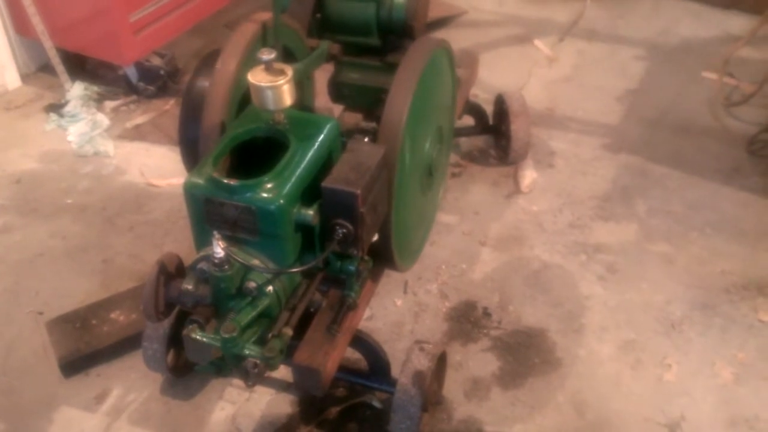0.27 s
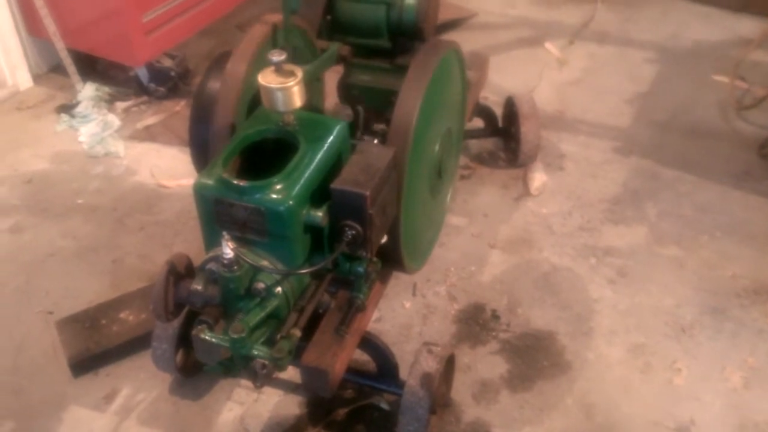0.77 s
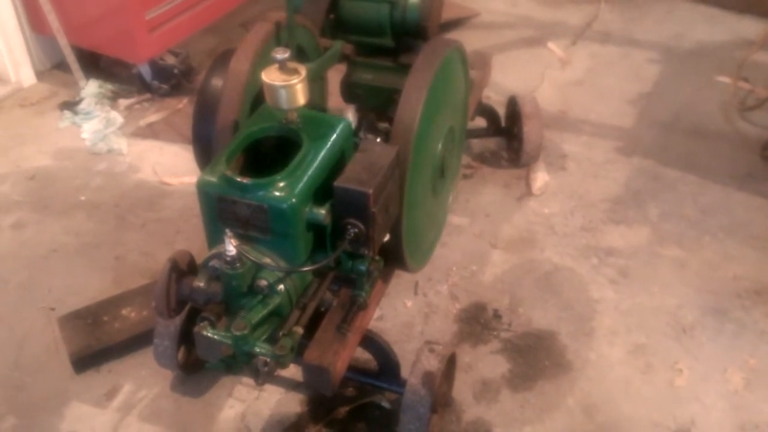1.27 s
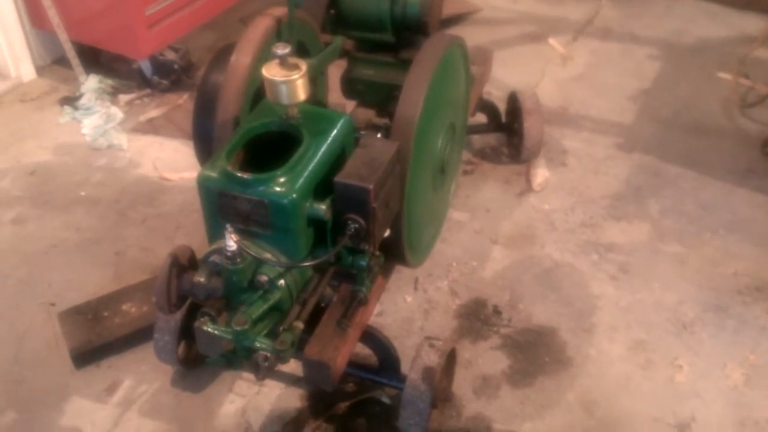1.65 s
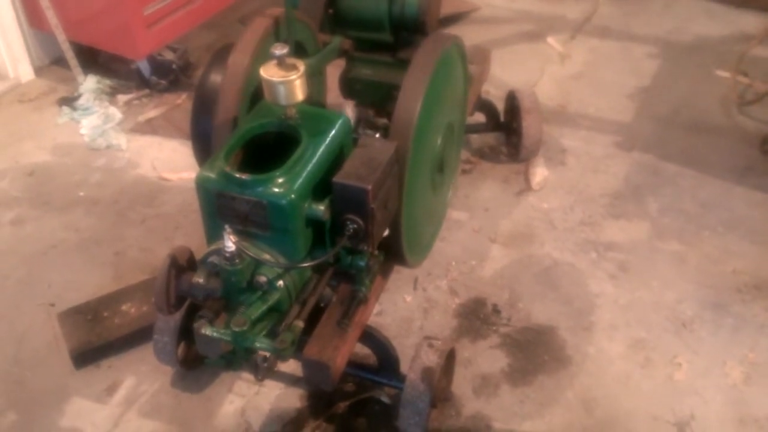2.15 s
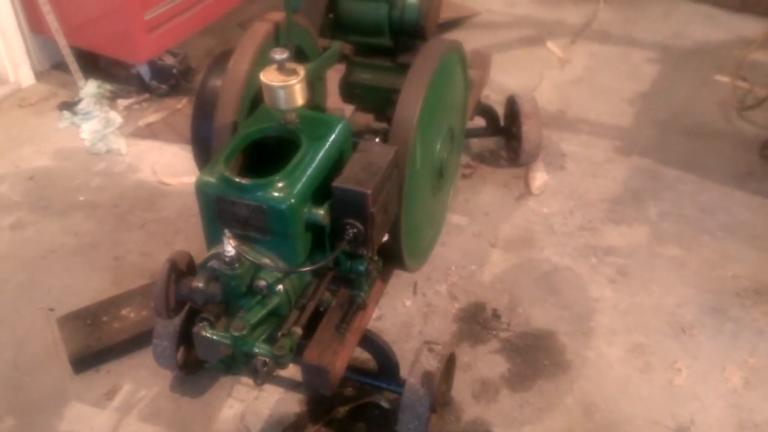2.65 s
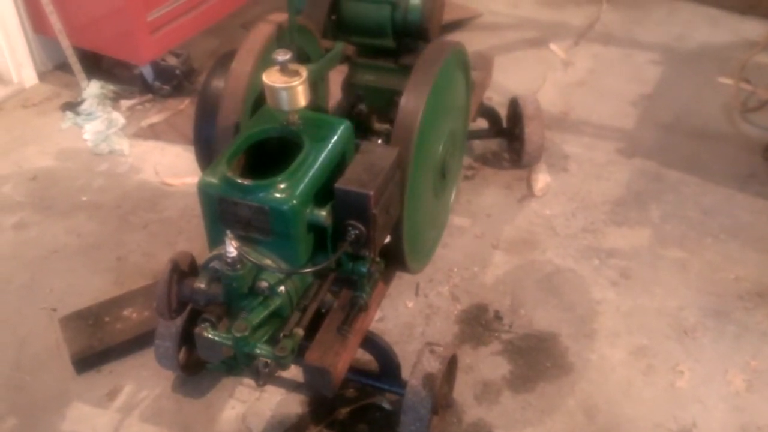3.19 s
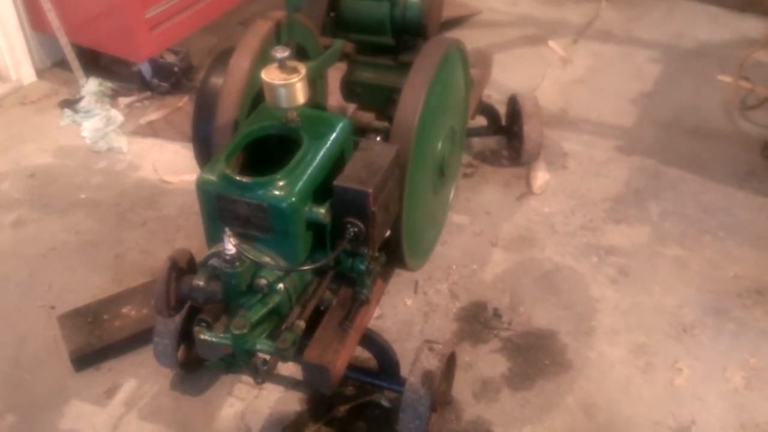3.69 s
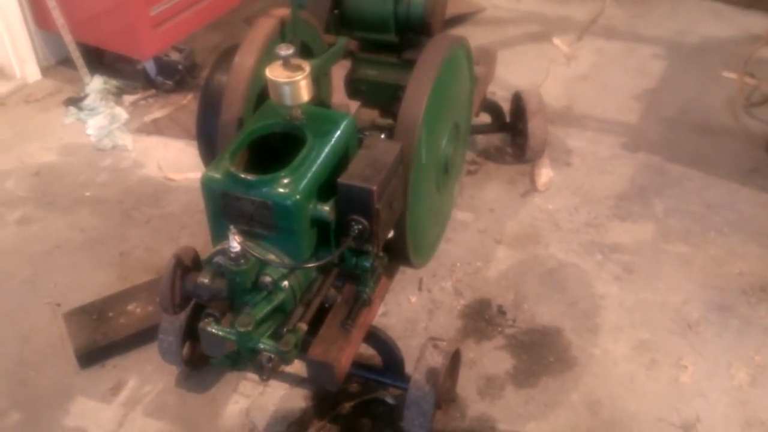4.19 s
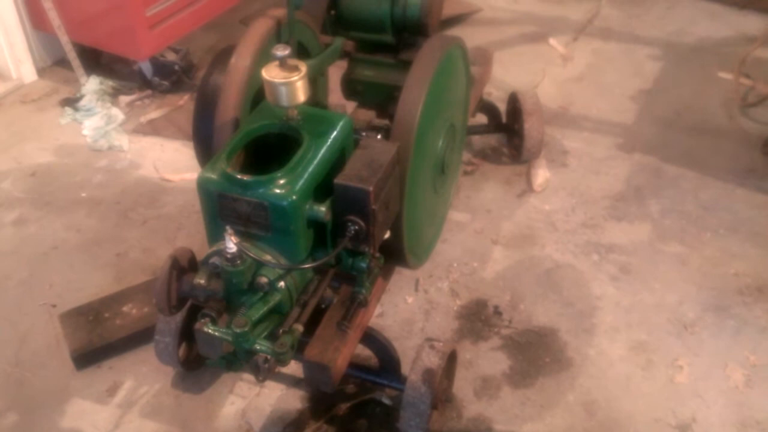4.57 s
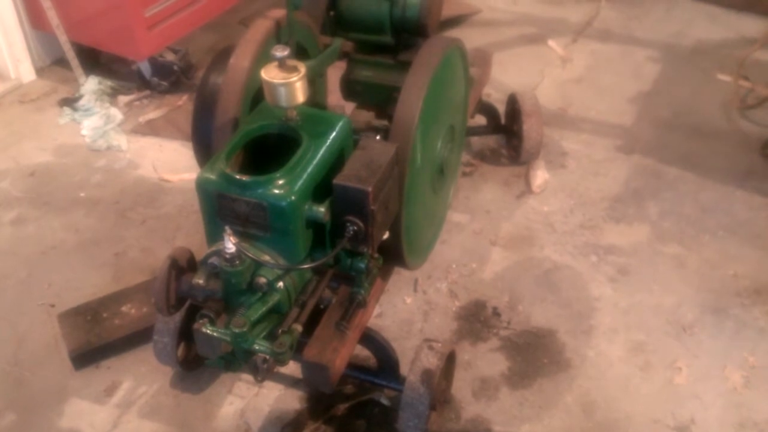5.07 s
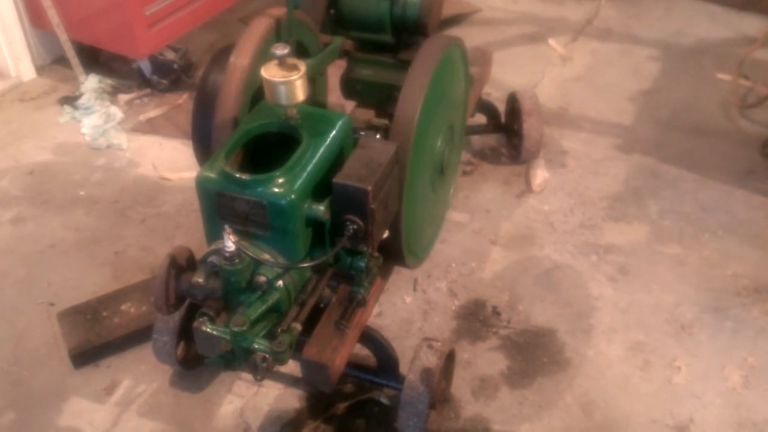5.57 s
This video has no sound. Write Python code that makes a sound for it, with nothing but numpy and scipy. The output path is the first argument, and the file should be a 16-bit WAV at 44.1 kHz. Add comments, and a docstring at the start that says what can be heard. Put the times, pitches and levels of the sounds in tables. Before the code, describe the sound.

Close, wide stereo of an old hit-and-miss engine in a concrete garage with about half a second of echo. It opens mid-cycle with a small clank and gear rattle, then two crisp trip clicks just before the first firing at 0.27 s. Firings repeat at 2.24 and 4.21 s: an instant rising pop bursts into a harsh, broadband gas blast, crackling and clipped, full for a few hundredths of a second and fading over roughly 0.4 s. Between shots the engine coasts with soft breathy puffs near 280 Hz, several per second, loose gear clatter and tiny latch ticks. Dry push rod knocks ring around 1.5-2.5 kHz near 0.7, 1.15, 1.68, 2.67, 3.12, 3.65, 4.64, 5.09 and 5.62 s. Stronger, brighter valve clanks land near 1.74, 3.72 and 5.68 s, with high hissing spits clustering around them, strongest near 1.84 and 3.81 s. A faint low rumble lies beneath.

```python
"""Hit-and-miss engine in a garage

The engine runs on a concrete floor, heard close from above by two ports wired in opposite sense.
About every two seconds the igniter trips and it fires: a rising sine pop, then a clipping jet of noise.
In between it coasts: noise puffs and hisses through pipe and valves, gears clatter, and push rod, valves
and latch knock as bursts of noise ringing through metal modes. Low noise makes the rumble of frame and shed.
"""
import sys
import numpy as np
from scipy import signal
from scipy.fft import rfft, irfft, next_fast_len
from scipy.io import wavfile
from scipy.ndimage import uniform_filter1d

SR = 44100
rng = np.random.default_rng(int(sys.argv[2]) if len(sys.argv) > 2 else 0)


def waveform_to_disk(signal):
    """Save audio, clipped to [-1, 1], as 16-bit WAV at the path in sys.argv[1]."""
    frames = np.transpose(np.atleast_2d(signal))
    scaled = np.clip(frames, -1, 1) * 32767
    samples = np.round(scaled).astype(np.int16)
    wavfile.write(sys.argv[1], SR, samples)


N = 257527
T = np.arange(N) / SR
CYCLE_S = 1.97  # cycle length on which the repeating patterns are timed

# The firings. Each entry: start in seconds.
FIRING_TIMES = [.2670, 2.2354, 4.2091]
# Ringing modes of the push rod. Each row: frequency in Hz, width in Hz, relative level in dB.
ROD_MODES = [(1442, 56, 4.5), (1649, 85, 3.5), (2010, 210, 11), (2444, 36, 2.5), (2570, 8.7, -5),
             (3110, 23, -3.5), (3380, 57, -4), (3380, 78, -2.5), (4240, 120, -14), (4020, 32, -21.5),
             (4350, 82, -12), (5570, 36, -35.5), (6370, 42, -1.5)]
# Ringing modes of the cylinder head. Each row: frequency in Hz, width in Hz, relative level in dB.
HEAD_MODES = [(1458, 30, -10), (2032, 180, -2.5), (2371, 20, 1), (3490, 33, 2.5), (3580, 190, -2),
              (4774, 52, -1), (6220, 220, -7.5), (8000, 30, -13.5), (8490, 180, -12.5), (9240, 83, -28),
              (9390, 25, -16.5)]


def undb(db):
    """Decibels to an amplitude factor."""
    return 10 ** (np.asarray(db) / 20)


def unit(x):
    """Scale a sound to rms 1."""
    return x / np.sqrt(np.mean(x ** 2))


def along(points, size):
    """A (Hz, value) table read at the bins of a transform, on a log frequency axis."""
    hz, value = np.transpose(points)
    bins_hz = np.arange(size // 2 + 1) * SR / size
    return np.interp(np.log(bins_hz + 1), np.log(hz), value)


def noise(spectrum):
    """Noise of rms 1, coloured by a (Hz, dB) table."""
    size = next_fast_len(N)
    white = rfft(rng.standard_normal(size))
    return unit(irfft(white * undb(along(spectrum, size)), size)[:N])


def ring(x, hz, width_hz):
    """Two-pole resonance."""
    return signal.lfilter(*signal.iirpeak(hz, hz / width_hz, SR), x)


def walk(rate):
    """Random levels held 1 / rate s and slewed; spread near 1."""
    k = int(SR / rate)
    steps = np.repeat(rng.standard_normal(N // k + 1), k)
    return 1.29 * uniform_filter1d(uniform_filter1d(steps, k), k)[:N]


def add(out, s, sound):
    """Lay a sound into the track at s seconds."""
    i = int(s * SR)
    out[i:i + len(sound)] += sound[:N - i]


def cycles():
    """Start and end times of every cycle from firing to firing."""
    first_s, last_s = 1.968, 1.963  # lengths of the cycles before the first and after the last firing
    marks = [FIRING_TIMES[0] - first_s, *FIRING_TIMES, FIRING_TIMES[-1] + last_s]
    return list(zip(marks, marks[1:]))


def every_cycle(pattern):
    """A pattern timed from the firing, repeated and stretched to each cycle."""
    rows = [(a + s * (b - a) / CYCLE_S, *rest) for a, b in cycles() for s, *rest in pattern]
    return [row for row in rows if .004 < row[0] < N / SR]


def pair(spectra, weights):
    """Two ports from two unrelated spectra: one adds alike to both, the other oppositely."""
    return np.array([weights[0] * spectra[0] + k * weights[1] * spectra[1] for k in (1, -1)])


def garage():
    """Weights of the sound alike and opposite at the ports, and the decaying noise tails of the room."""
    # How long the room rings. Each row: frequency in Hz, time to fall by 60 dB in seconds.
    decay = [(100, 0.38), (500, 0.52), (2000, 0.66), (6000, 0.5), (14000, 0.15)]
    # Likeness of the sound at both ports. Each row: frequency in Hz, likeness from 0 to 1.
    likeness = [(60, 0.84), (200, 0.79), (600, 0.79), (1000, 0.26), (1500, 0.07)]
    decay_hz, decay_s = np.transpose(decay)
    size, t, tails = next_fast_len(N + SR), T[:SR], 0
    for hz in 60 * 2 ** np.arange(0, 8.1, .5):  # half-octave bands
        t60 = np.interp(np.log(hz), np.log(decay_hz), decay_s)
        band = ring(rng.standard_normal((2, SR)), hz, hz / 2.0)
        band = band * undb(-60 * t / t60) / np.sqrt(t60)
        tails = tails + band * (1 - np.exp(-t / 0.001))
    tails = tails / np.sqrt(np.sum(tails[0] ** 2))
    alike = np.clip(along(likeness, size), 0, 1)
    weights = np.sqrt((1 + alike) / 2), np.sqrt((1 - alike) / 2)
    return weights, pair(rfft(tails, size), weights), size


def shed():
    """Low rumble of frame and shed: steady coloured noise."""
    # Colour of the rumble. Each row: frequency in Hz, relative level in dB.
    rumble = [(15, -51), (25, -23), (64, -25), (115, -6), (257, 4), (338, 2.5), (430, -13), (810, -1.5),
              (1500, -13), (1950, -47), (3300, -120)]
    return noise(rumble)


def running():
    """Air hiss, gear teeth rattling in dense ticks, and the low throb of the intake."""
    # Levels through one cycle. Each row: seconds after firing, relative levels in dB of the
    # air hiss at the valves, the gear clatter and the intake throb.
    levels = [(0, -42.5, -17.5, -42.5), (.28, -52.5, -35, -67.5), (.34, -57.5, -31.5, -55.5),
              (.55, -52, -32.5, -65), (.66, -63, -43.5, -75), (.76, -58, -31.5, -75),
              (.86, -68, -45.5, -55), (.92, -52, -27.5, -73), (1.10, -70, -45.5, -58),
              (1.20, -91, -42, -69), (1.29, -46, -32.5, -57), (1.39, -63.5, -45, -64),
              (1.44, -64, -27.5, -80), (1.49, -41.5, -35, -68), (1.56, -31, -36, -42.5),
              (1.64, -26, -36.5, -39), (1.71, -57.5, -36.5, -54), (1.75, -46, -28, -63.5),
              (1.84, -55, -43.5, -66.5), (1.88, -38, -22.5, -57), (1.92, -38.5, -29.5, -50),
              (1.97, -40, -19, -46)]
    # Colour of the air hiss. Each row: frequency in Hz, relative level in dB.
    hiss_colour = [(880, -46), (1500, -24), (2430, -2.5), (2860, -10), (3540, -2.5), (6360, -2), (7720, -3),
                   (10700, -0.5), (15000, -16.5)]
    # Colour of the gear clatter. Each row: frequency in Hz, relative level in dB.
    clatter_colour = [(240, -9), (400, -0.5), (450, -10), (486, 1.5), (1020, -4.5), (1190, 1), (2010, -6.5),
                      (3010, -5), (3520, -14), (3960, -7.5), (9000, -28), (11700, -41.5), (19800, -120)]
    # The throb swells once while coasting: middle in seconds, relative level in dB, length in seconds.
    hum = (2.72, -51.5, 0.6)
    throb_hz, throb_width_hz = 110, 34  # width of each of two resonances in a row

    starts, ends = np.transpose(cycles())
    turns = np.interp(T, np.append(starts, ends[-1]), np.arange(len(starts) + 1))
    since = turns % 1 * CYCLE_S
    s, *columns = np.transpose(levels)
    hiss_db, clatter_db, throb_db = (np.interp(since, s, c) for c in columns)

    hiss = noise(hiss_colour) * undb(hiss_db + 2.9 * walk(60) + 2.4 * walk(500))

    teeth = noise(clatter_colour) * undb(2.64 * walk(150) + 3.9 * walk(30))
    # the teeth also excite the narrow modes of rod and head
    narrow = [mode for mode in ROD_MODES + HEAD_MODES if mode[1] < 100]
    ringing = sum(undb(db) * ring(teeth, hz, w) for hz, w, db in narrow)
    teeth = unit(teeth) + 0.47 * unit(ringing)

    throb = ring(rng.standard_normal(N), throb_hz, throb_width_hz)
    throb = unit(ring(throb, throb_hz, throb_width_hz))
    middle_s, hum_db, length_s = hum
    swell = undb(hum_db) * np.cos(np.pi * np.clip((T - middle_s) / length_s, -.5, .5)) ** 2

    clatter = undb(clatter_db - 8.0) * teeth
    return undb(-0.5) * hiss + clatter + (undb(throb_db + 2.5) + swell) * throb


def puffs():
    """Each stroke of the coasting piston blows a soft, breathy note in the open exhaust pipe."""
    # Strokes of a cycle. Each row: middle in seconds after firing, relative level in dB, pitch in Hz.
    strokes = [(.057, -31.5, 251), (.305, -33.5, 280), (.5, -35.5, 282), (.628, -40.5, 292),
               (.748, -35.5, 290), (.991, -35, 272), (1.12, -45.5, 285), (1.249, -36.5, 273),
               (1.43, -41, 290), (1.552, -31, 316), (1.72, -39, 300), (1.89, -41, 300)]
    pipe_hz, pipe_width_hz, puff_s = 285, 190, .07
    out, t = np.zeros(N), T[:int(puff_s * SR)]
    breath = unit(ring(rng.standard_normal(N), pipe_hz, pipe_width_hz))
    for s, level_db, hz in every_cycle(strokes):
        air = breath[int(s * SR / 2):][:len(t)]  # another stretch of noise for each puff
        note = np.sin(2 * np.pi * hz * t) + 0.68 * air
        add(out, max(s - puff_s / 2, 0), undb(level_db) * np.hanning(len(t)) * note)
    return out


def spits():
    """Air and small parts at the valves: sharp starts of high hiss that die away."""
    # Spits of a cycle. Each row: seconds after firing, relative level in dB,
    # time to fall by 60 dB in seconds.
    valve_spits = [(.003, -4, 0.18), (.431, -36, 0.11), (.4765, -31.5, 0.087), (.545, -40, .12),
                   (.711, -41, .1), (.773, -36, .15), (.884, -37, .12), (.937, -29.5, 0.077),
                   (1.0175, -35.5, .17), (1.281, -35, .16), (1.407, -41, 0.13), (1.477, -25, .14),
                   (1.512, -30, .15), (1.551, -31, .15), (1.572, -20.5, .25), (1.736, -26, 0.14),
                   (1.852, -22, .14), (1.926, -26, 0.17)]
    flow, t = np.zeros(N), T[:SR // 4]
    for s, level_db, t60 in every_cycle(valve_spits):
        accent = 1 + 1.1 * np.exp(-t / .002)
        add(flow, s, undb(level_db - 60 * t / t60) * accent)
    treble = ring(ring(rng.standard_normal(N), 11000, 7000), 11000, 7000)
    return flow * unit(treble)


def blows(events, touch, modes):
    """Each blow chatters for a few ms into the casting's modes, with a broad crack and a thin treble tick."""
    # Colour of the broad part of a blow. Each row: frequency in Hz, relative level in dB.
    crack_colour = [(180, -58.5), (300, -14.5), (1020, -11), (1940, -1.5), (3220, -6), (3610, -1),
                    (3980, -8), (4770, -6), (11000, -28.5), (15000, -78)]
    out, t = np.zeros(N), T[:6144]
    mode_hz, width, mode_db = np.transpose(modes)
    tick_db, crack_db, chatter_s = touch
    for s, level_db in events:
        # the loose parts bounce: the force swells within a few milliseconds, then dies away
        shake = rng.standard_normal(len(t))
        bounce = shake * (1 - np.exp(-t / 0.0041)) * np.exp(-t / chatter_s)
        # no two blows ring the modes quite alike
        shift, spread = rng.standard_normal((2, len(mode_hz)))
        struck = zip(mode_hz * (1 + .006 * shift), width, mode_db + 3.0 * spread)
        body = sum(undb(db) * ring(bounce, hz, w) / np.sqrt(w) for hz, w, db in struck)
        crack = irfft(rfft(bounce) * undb(along(crack_colour, len(t))), len(t))
        sound = unit(unit(body) + undb(crack_db) * unit(crack))
        sound = sound * np.sqrt(chatter_s / t[-1])  # a shorter chatter carries less energy
        tick = ring(ring(shake * np.exp(-t / 0.0024), 9900, 6000), 9900, 6000)
        add(out, s - .003, undb(level_db) * (sound + undb(tick_db) * 1.5 * tick))
    return out


def metal():
    """All blows of the valve gear, each kind ringing the rod or the head with its own touch."""
    # Push rod dropping off the cam. Each row: time in seconds, relative level in dB.
    rod_knocks = [(0.6992, -15), (1.1543, -14), (1.6771, -12.5), (2.6715, -10.5), (3.1224, -13.5),
                  (3.6507, -12), (4.6433, -9.5), (5.0945, -12.5), (5.6174, -16.5)]
    # Valves seating in the head. Each row: time in seconds, relative level in dB.
    valve_clanks = [(0.0359, -10.5), (1.7422, -7.5), (2.0014, -12.5), (3.715, -5.5), (3.9766, -13),
                    (5.6849, -7.5)]
    # Igniter and latch tripping just before a firing. Each row: time in seconds, relative level in dB.
    trips = [(0.1571, -15.5), (0.2236, -12.5), (2.1269, -15), (2.1934, -12), (4.0985, -14.5),
             (4.1700, -9.5)]
    # Latch and governor ticking on the rod in every cycle. Each row: seconds after firing,
    # relative level in dB.
    latch_ticks = [(.343, -23.5), (.373, -24), (.482, -24.5), (.503, -33), (.585, -24.5), (.716, -29),
                   (.754, -27.5), (.814, -26), (.94, -29), (1.063, -28.5), (1.182, -35.5), (1.222, -33),
                   (1.257, -28), (1.299, -22), (1.513, -18.5), (1.707, -22.5), (1.765, -25.5)]
    # each touch: treble tick in relative dB, crack in dB against the ringing body, chatter decay in s
    knock_touch, clank_touch = (-33, 3.7, 0.0053), (-27, -2.3, 0.0074)
    trip_touch, tick_touch = (-10.5, 40, .011), (-24.5, 0, .006)
    knocks = blows(rod_knocks, knock_touch, ROD_MODES)
    clanks = blows(valve_clanks, clank_touch, HEAD_MODES)
    tripping = blows(trips, trip_touch, ROD_MODES)
    ticking = blows(every_cycle(latch_ticks), tick_touch, ROD_MODES)
    return knocks + clanks + tripping + ticking


def pops():
    """The pressure front rings the pipe mouth just ahead of the jet, rising in pitch as the valve opens."""
    start_hz, decay_s, rise_s = 650, .007, .007  # the pitch doubles in half of rise_s
    out, t = np.zeros(N), T[:1024]
    for s in FIRING_TIMES:
        tone = np.sin(2 * np.pi * start_hz * (t + t ** 2 / rise_s))
        add(out, s, undb(-4.5) * tone * np.exp(-t / decay_s))
    return out


def jet():
    """Gas jets out through the muffler, crackling, until the cylinder is empty."""
    # Colour of the blast. Each row: frequency in Hz, relative level in dB.
    blast_colour = [(24, -43), (40, -22.5), (182, -2.5), (582, -18), (824, -4.5), (1080, -10), (1730, -1),
                    (1960, 0.5), (2640, -0.5), (3470, -4), (4910, -1), (6780, -4.5), (10100, -4.5),
                    (15000, -22)]
    # Ringing modes of the muffler. Each row: frequency in Hz, half the width in Hz, relative level in dB.
    muffler = [(2430, 41, -2), (3360, 196, 6.5), (4530, 250, -1), (7140, 94, 0), (7950, 36, -6),
               (9100, 66, -5), (8700, 34, -6), (10380, 76, 4), (11530, 62, -1), (12200, 190, -7.5)]
    jet_db, lag_s, full_flow_s, flow_t60_s = -7, .0012, 0.039, .4
    flow, t = np.zeros(N), T[:SR // 2]
    onset = (1 - np.exp(-t / 0.0017)) * (1 + 0.24 * np.exp(-t / 0.015))
    emptying = undb(-60 * np.maximum(t - full_flow_s, 0) / flow_t60_s)
    for s in FIRING_TIMES:
        add(flow, s + lag_s, undb(jet_db) * onset * emptying)
    gas = noise(blast_colour) * undb(2.96 * walk(60) + 2.38 * walk(900))  # crackle
    ringing = sum(undb(db) * ring(gas, hz, 2 * w) for hz, w, db in muffler)
    return flow * (gas + 0.36 * unit(ringing))


def scene():
    """All sources at both ports, each but the pops with its share of garage echo."""
    weights, echo, size = garage()

    def heard(source, gain_db, echo_db):
        """One source at both ports, its direct sound and echo mixed at echo_db."""
        # the engine is wide and near: in the treble each port hears another face of it
        faces = rfft(np.array([source(), source()]), size)
        both = pair(faces, weights) + undb(echo_db) * echo * faces[0]
        return irfft(both, size)[:, :N] * undb(gain_db) / np.sqrt(1 + undb(echo_db) ** 2)

    mix = heard(shed, gain_db=-47.5, echo_db=-11)
    mix = mix + heard(running, gain_db=2.0, echo_db=0.0)
    mix = mix + heard(puffs, gain_db=0.0, echo_db=1.5)
    mix = mix + heard(spits, gain_db=-11.0, echo_db=-5.5)
    mix = mix + heard(metal, gain_db=-2.5, echo_db=1.5)
    mix = mix + pops()  # direct and alike at both ports
    return mix + heard(jet, gain_db=-1.5, echo_db=-1.5)


def record(dry):
    """Left is muffled in the treble, right inverted; both clip hard at full scale, then lose the top treble."""
    # Difference between the ports. Each row: frequency in Hz, left minus right in dB.
    port_tilt = [(60, 3), (110, 1), (200, -3), (380, 0), (700, -3), (1290, -0.5), (2380, -4), (4400, 3),
                 (8120, -6.5), (15000, -16.5)]
    top_hz = 15750  # a steep low-pass leaves no treble above it
    size = next_fast_len(N)
    tilt = along(port_tilt, size) / 2
    ports = irfft(rfft(dry, size) * undb([tilt, -tilt]), size)[:, :N]
    ports = ports * np.array([[1], [-1]])
    low_pass = signal.ellip(10, .2, 70, top_hz, fs=SR, output="sos")
    return signal.sosfilt(low_pass, np.clip(ports, -1, 1))


dry = scene()
out = record(dry)
waveform_to_disk(out)
```